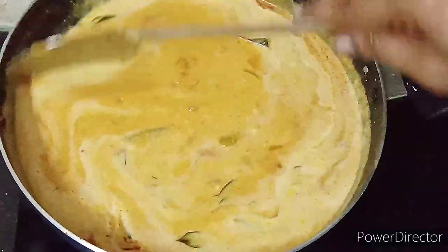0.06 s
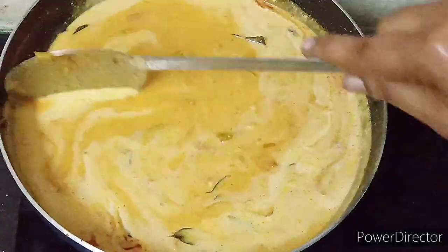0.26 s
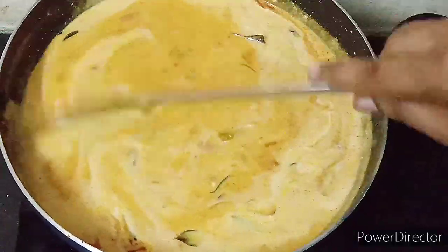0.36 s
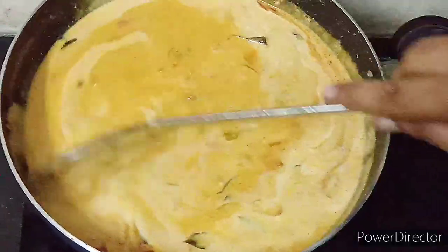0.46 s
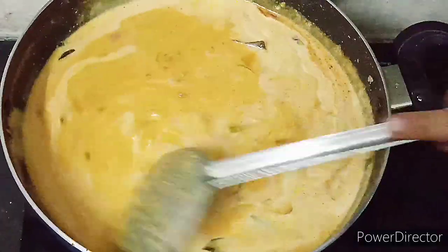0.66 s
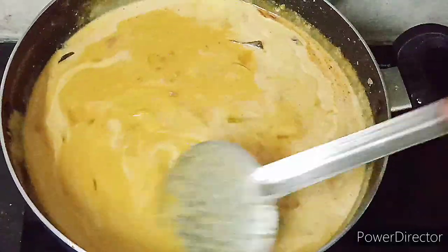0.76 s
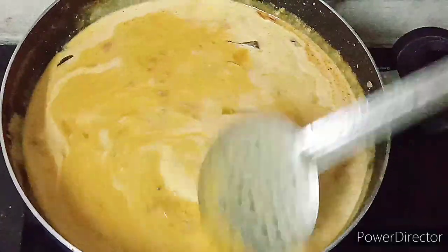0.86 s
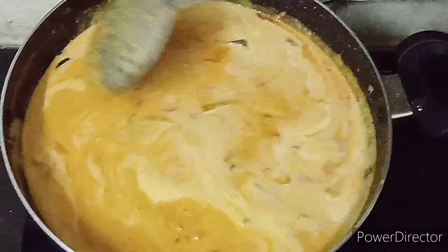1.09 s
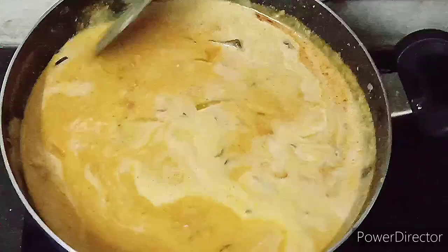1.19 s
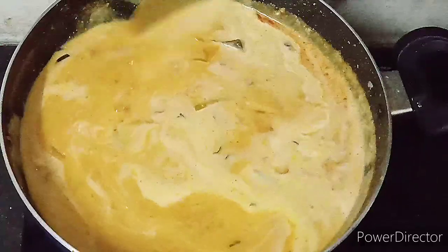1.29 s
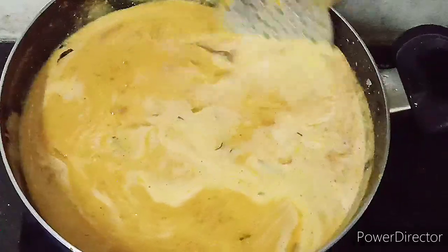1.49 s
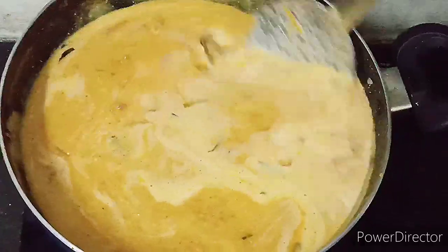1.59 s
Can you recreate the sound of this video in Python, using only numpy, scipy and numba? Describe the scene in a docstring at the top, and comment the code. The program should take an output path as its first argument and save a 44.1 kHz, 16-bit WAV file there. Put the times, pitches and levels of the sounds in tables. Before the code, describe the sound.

A perforated metal ladle scrapes gritty strokes along a metal pan of thin gravy, with several quick clanks early on, a short lull, then a duller knock and more scraping; close phone microphone, small hard kitchen.

```python
"""Over a faint noise floor a perforated steel ladle is dragged on the bottom of a pan of thin gravy.
Four knocks fall between 0.2 and 0.5 s as the drag goes on; it fades out near 1 s, then a knock at 1.24 s
starts it again. Grit (random impulses) and knocks (click plus rattle) push the same damped modes of pan
and ladle and a dense field of small modes; a small hard kitchen answers with a noise tail."""
import sys
import numpy as np
from scipy import signal
from scipy.fft import rfft, irfft
from scipy.io import wavfile
from scipy.ndimage import uniform_filter1d
from numba import njit

SR = 44100
rng = np.random.default_rng(int(sys.argv[2]) if len(sys.argv) > 2 else 0)


def inscribe(sig):
    """Save sig as 16-bit PCM at rate SR to the path in sys.argv[1].

    A 1-D sig is mono; a 2-D sig holds one channel per row.
    Samples are clipped to [-1, 1] before scaling.
    """
    pcm = np.round(np.clip(np.atleast_2d(sig).T, -1, 1) * 32767)
    wavfile.write(sys.argv[1], SR, pcm.astype(np.int16))


N = 72765

# spectrum of the countless small modes between the main ones: hz, level_db_per_hz
DENSE_SPECTRUM = [(100, -18), (200, -17), (360, -6.5), (520, -5), (800, -1.5), (1600, -6), (3500, -0.5),
                  (4500, -10.5), (6000, -8.5), (7300, -1), (9000, -14), (11500, -25.5), (13000, -24.5),
                  (15500, -21)]
THUMP_HZ = 343  # pan bottom: thump of the knocks, rumble of the drag


def undb(db):
    """Amplitude ratio of a level in dB."""
    return 10 ** (np.asarray(db) / 20)


def unit(x):
    """Scale to RMS 1."""
    return x / np.sqrt(np.mean(x ** 2))


def read(table, hz):
    """Value of a (hz, value) table, interpolated on a log-frequency axis."""
    table_hz, values = np.array(table, float).T
    return np.interp(np.log(np.maximum(hz, 1)), np.log(table_hz), values)


def shape(x, gain):
    """Filter by a gain given as a function of frequency."""
    return irfft(rfft(x) * gain(np.fft.rfftfreq(len(x), 1 / SR)), len(x))


def tail(t60_table, size):
    """Noise whose half-octave bands each die at their own rate; energy 1."""
    t = np.arange(size) / SR
    noise = rng.standard_normal(size)
    out = 0
    for centre_hz in 60 * 2 ** np.arange(0, 8.6, .5):
        def band_gain(f):
            octaves_off = np.log2(np.maximum(f, 1) / centre_hz)
            return np.cos(np.pi * np.clip(octaves_off, -.5, .5)) ** 2
        t60_s = read(t60_table, centre_hz)
        # root of the T60: a long ring gains no energy
        out = out + shape(noise, band_gain) * undb(-60 * t / t60_s) / np.sqrt(t60_s)
    return out / np.sqrt(np.sum(out ** 2))


def walk(rate_per_s):
    """Random levels, each held for 1 / rate and slewed to the next; RMS 1."""
    hold = int(SR / rate_per_s)
    steps = np.repeat(rng.standard_normal(N // 20), hold)[:N]
    return unit(uniform_filter1d(steps, hold))


@njit
def svf(x, hz, k):
    """State-variable band-pass with a moving centre and relative width k."""
    y, band_state, low_state = np.empty(len(x)), 0., 0.
    for i in range(len(x)):
        g = np.tan(np.pi * hz[i] / SR)
        v = (band_state + g * (x[i] - low_state)) / (1 + g * (g + k))
        band_state = 2 * v - band_state
        low_state = low_state + 2 * g * v
        y[i] = k * v
    return y


def floor():
    """Faint steady noise with a fixed spectrum, nothing below 20 Hz."""
    # hz, relative_level_db
    floor_spectrum = [(15, -44), (25, -25), (96, -4.5), (125, -2.5), (183, -7), (252, 0), (304, -3.5),
                      (521, -8), (2680, -13), (3240, -14), (5700, -29), (7870, -15.5), (10600, -38),
                      (15400, -20)]
    level_db = -58
    noise = shape(rng.standard_normal(N), lambda f: undb(read(floor_spectrum, f)) * (f > 20))
    return unit(noise) * undb(level_db)


def drag():
    """Dense grit under a juddering edge: a grinding band that follows the stroke and a bright hiss."""
    # course of the stroke: time_s, grind_db, grind_hz, hiss_db
    stroke = np.array([(0, -43.5, 1860, -41.5), (0.019, -50.5, 1898, -40), (0.119, -52.5, 1850, -46),
                       (0.202, -49.5, 1210, -46), (.26, -57.5, 1390, -52), (0.391, -62, 930, -75),
                       (.41, -42, 1550, -33.5), (0.502, -48, 1180, -45), (.57, -50.5, 1040, -53),
                       (.66, -47.5, 990, -47.5), (0.718, -41.5, 896, -47), (.75, -49.5, 860, -49),
                       (0.776, -56.5, 775, -61.5), (0.796, -46, 840, -49.5), (.84, -42.5, 840, -48.5),
                       (0.901, -53, 784, -46.5), (0.929, -54.5, 845, -55), (.98, -108, 794, -68),
                       (1.02, -113, 810, -107), (1.236, -96, 1186, -91), (1.245, -43.5, 1030, -33.5),
                       (1.3, -47.5, 1260, -42), (1.37, -50.5, 1390, -48.5), (1.43, -45.5, 1300, -42.5),
                       (1.48, -54, 1390, -53), (1.538, -50.5, 820, -52), (1.598, -61.5, 855, -61.5),
                       (1.65, -51.5, 670, -61)], float).T
    grit_per_s, grit_spread_db = 6000, 2
    judder_db, judder_per_s = 1.5, 70
    grind_width, hiss_hz = 0.78, 2700
    rumble_db = -23.5  # relative to the grinding

    t = np.arange(N) / SR
    grind_db, grind_hz, hiss_db = (np.interp(t, stroke[0], column) for column in stroke[1:])

    hits = rng.random(N) < grit_per_s / SR
    grain_db = grit_spread_db * np.minimum(rng.exponential(size=N), 2)
    grit = unit(rng.standard_normal(N) * hits * undb(grain_db))
    grit = grit * undb(judder_db * walk(judder_per_s))

    # sqrt(SR / 2 / centre) offsets the level lost in a narrower band
    grind = svf(svf(grit, grind_hz, 1. * grind_width), grind_hz, 2. * grind_width)
    grind = grind * np.sqrt(SR / 2 / grind_hz)
    hiss = shape(grit + rng.standard_normal(N), lambda f: f ** 4 / (f ** 4 + hiss_hz ** 4))
    # pan bottom, driven by shifted grit so that it is not in step with the grind
    rumble = unit(svf(np.roll(grit, N // 3), np.full(N, 1. * THUMP_HZ), 0.53))
    rumble = rumble * np.sqrt(SR / 2 / THUMP_HZ)
    return (grind + undb(rumble_db) * rumble) * undb(grind_db) + hiss * undb(hiss_db)


def favour(hz):
    """Extra coupling (dB) of the rubbing into one mode while the place of contact favours it."""
    # mode favoured in each stretch: mode_hz
    singing_hz = [2108, 1445, 815, 1130, 1770, 1340, 895, 686, 1512, 1888, 1130, 358, 815]
    # the stretches: start_s, end_s, boost_db
    singing = [(0, 0.148, 8.3), (0.03, 0.192, 14), (0.06, 0.237, 12.6), (0, 0.123, 12.4),
               (0.504, 0.765, 9.6), (0.562, 0.69, 2.6), (0.667, .9, 4.4), (0.716, 0.94, 3.6),
               (1.3, 1.504, 9), (1.36, 1.47, 9.2), (1.39, 1.51, 10.2), (1.52, 1.56, 1.8),
               (1.604, 1.65, 5.2)]
    ramp_s = 0.022
    t = np.arange(N) / SR
    total_db = 0
    for mode_hz, (start_s, end_s, boost_db) in zip(singing_hz, singing):
        if mode_hz == hz:
            inside_s = np.minimum(t - start_s, end_s - t)
            total_db = total_db + boost_db * np.clip(inside_s / ramp_s + 1, 0, 1)
    return total_db


def ring(force, rubbed):
    """Two-pole modes of pan and ladle; under rubbing each couples unevenly as the contact moves."""
    # gravy-damped pan modes: mode_hz
    pan_hz = [358, 455, 686, 815, 895, 1020, 1130, 1340, 1445, 1512, 1610, 1770, 1888, 2108]
    # the same modes: level_db, t60_s
    pan = [(-9.5, 0.45), (-2, 0.096), (7, 0.067), (1, 0.11), (-2.5, 0.22), (4, 0.033), (3.5, 0.05),
           (3, 0.033), (1, 0.04), (1.5, .15), (2, 0.04), (8, 0.035), (-13, 0.35), (10, 0.06)]
    # ladle modes: mode_hz
    ladle_hz = [2200, 2520, 2720, 2910, 3230, 3425, 3548, 3917, 4500, 5114, 5850, 6400, 7142, 7800]
    # the same modes: level_db (before ladle_db), t60_s
    ladle = [(13.5, 0.05), (9.5, 0.033), (17.5, 0.033), (7, 0.14), (-16, 0.16), (17.5, 0.037), (-70, .12),
             (9, 0.082), (11, 0.027), (5, 0.042), (8, 0.033), (-43, .06), (-4, 0.06), (19.5, 0.027)]
    ladle_db, flicker_db, flicker_per_s = -4, 3, 25.495

    modes = pan + [(db + ladle_db, t60_s) for db, t60_s in ladle]
    out, energy = 0, 0
    for hz, (db, t60_s) in zip(pan_hz + ladle_hz, modes):
        radius = undb(-60 / (t60_s * SR))
        w = 2 * np.pi * hz / SR
        push = force * rng.choice([-1, 1])
        if rubbed:
            push = push * undb(flicker_db * walk(flicker_per_s) + favour(hz))
        b = [undb(db) / 2, 0, -undb(db) / 2]
        a = [1, -2 * radius * np.cos(w), radius * radius]
        out = out + signal.lfilter(b, a, push)
        energy += undb(db) ** 2 / (2 - 2 * radius * radius)
    return out / np.sqrt(energy)


def smooth(x, db):
    """Rubbing stirs ever other small modes, which blur into their mean colour."""
    gain = undb(read(DENSE_SPECTRUM, np.fft.rfftfreq(len(x), 1 / SR)))
    return irfft(rfft(x) * gain, len(x)) * undb(db) / np.sqrt(np.mean(gain ** 2))


def room():
    """Small hard kitchen: a short gap, then a noise tail."""
    # decay: hz, t60_s
    room_t60 = [(200, 1), (1500, 0.45), (6000, 0.62), (14000, 0.067)]
    gap_s, level_db = .003, -11
    response = np.r_[np.zeros(int(gap_s * SR)), tail(room_t60, size=24000)]
    return undb(level_db) * response


def dense(db):
    """Response of the many small modes, redrawn per knock: it differs with the place of contact."""
    # decay: hz, t60_s
    dense_t60 = [(200, 0.14), (1000, 0.2), (3500, 0.14), (10000, 0.023)]
    h = shape(tail(dense_t60, size=8192), lambda f: undb(read(DENSE_SPECTRUM, f)))
    h = h * np.hanning(16384)[8192:]
    return h * undb(db) / np.sqrt(np.sum(h ** 2))


def snap():
    """First flex of the thin steel: a few quick cycles at the start of a knock, together with the ringing."""
    snap_db, snap_hz, snap_t60_s = 0, 1633, 0.0046
    t = np.arange(8192) / SR
    attack = np.minimum(t * snap_hz, 1)
    h = np.sin(2 * np.pi * snap_hz * t) * undb(-60 * t / snap_t60_s) * attack
    return h * undb(snap_db) / np.sqrt(np.sum(h ** 2))


def knocks():
    """A click and a short rattle, coloured by how hard the contact is; the pan bottom thumps."""
    # start_s, level_db, contact_hz, half_width_octaves, thump_db
    knock_table = [(0.2124, -0.5, 1325, 1.06, -1), (.356, -22, 1270, 0.34, 11),
                   (0.3989, 7.5, 2700, 1.51, -3.5), (0.456, -1.5, 1310, 1.64, 1.5),
                   (1.2392, -7.5, 4500, 2.6, 13.5)]
    rattle_decay_s, rattle_db = 0.001, -8.5
    dense_db = 7

    force, body = np.zeros(N + 2048), np.zeros(N + 12000)
    t = np.arange(2048) / SR
    for start_s, level_db, contact_hz, octaves, thump_db in knock_table:
        rattle = rng.standard_normal(2048) * np.exp(-t / rattle_decay_s)
        push = undb(rattle_db) * rattle / np.sqrt(rattle_decay_s * SR / 2)
        push[0] += 1  # the click
        contact_band = [contact_hz / 2 ** octaves, min(contact_hz * 2 ** octaves, 13000)]
        contact = signal.lfilter(*signal.butter(2, contact_band, "band", fs=SR), push)
        thump_band = [THUMP_HZ / 1.63, THUMP_HZ * 1.25]
        thump = signal.lfilter(*signal.butter(1, thump_band, "band", fs=SR), push)
        push = undb(level_db) * (contact + thump * undb(thump_db))
        start = int(start_s * SR)
        force[start:][:2048] += push
        body[start:][:10239] += signal.fftconvolve(push, dense(dense_db) + snap())
    return ring(force[:N], False) + body[:N]


def scene():
    """Drag and knocks through the steel, the kitchen's answer and the floor."""
    dense_drag_db = -0.5
    grit = drag()
    near = ring(grit, True) + smooth(grit, dense_drag_db) + knocks()
    answer = signal.fftconvolve(near, room())[:N]
    return (near + answer + floor())[None]


def record(dry):
    """The phone rounds the loudest peak a little and cuts the top."""
    top_hz = 15650
    rounded = 1.6 * np.tanh(dry / 1.6)
    return signal.sosfilt(signal.ellip(10, .2, 75, top_hz, fs=SR, output="sos"), rounded)


dry = scene()
out = record(dry)
inscribe(out)
```